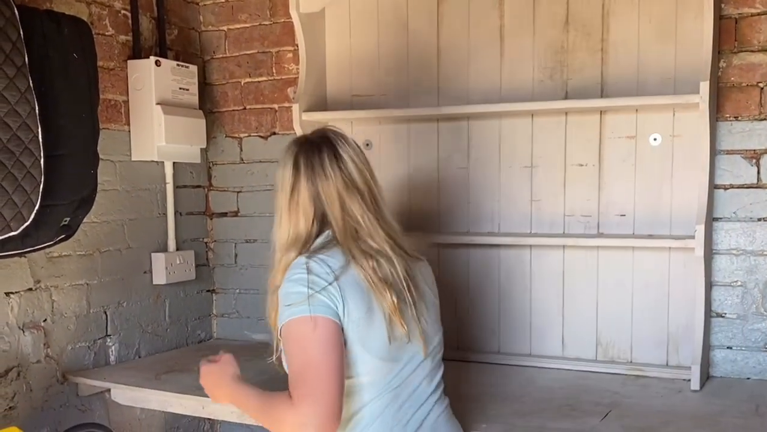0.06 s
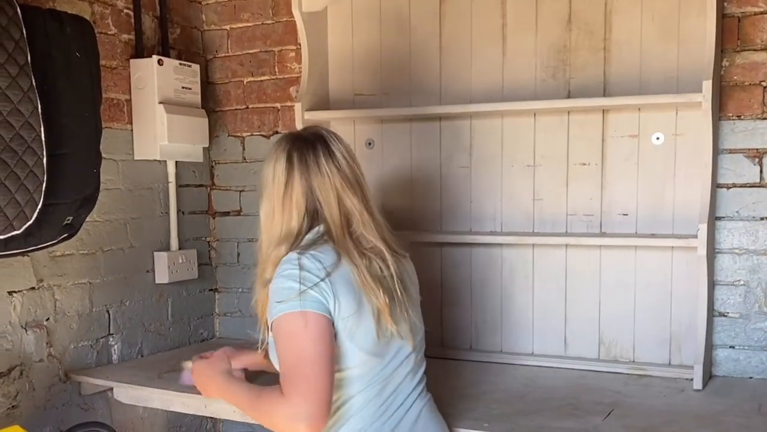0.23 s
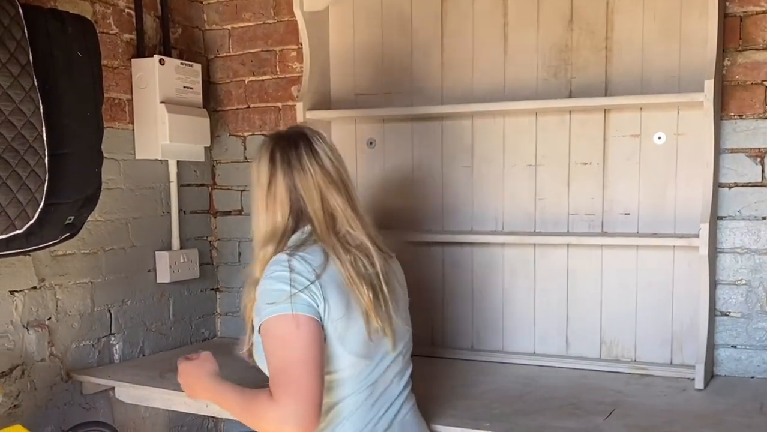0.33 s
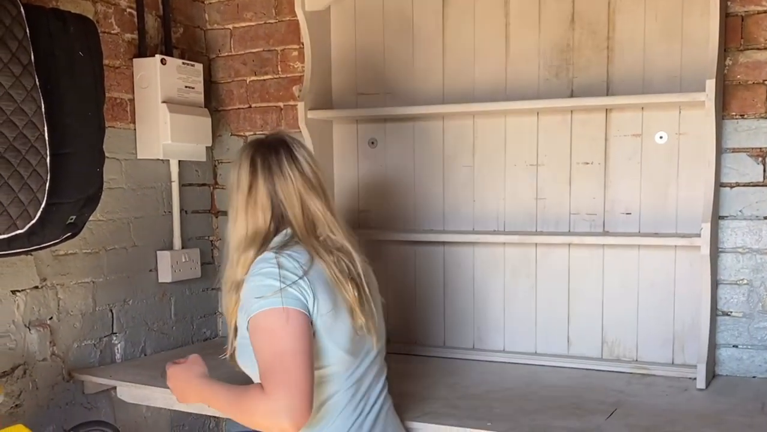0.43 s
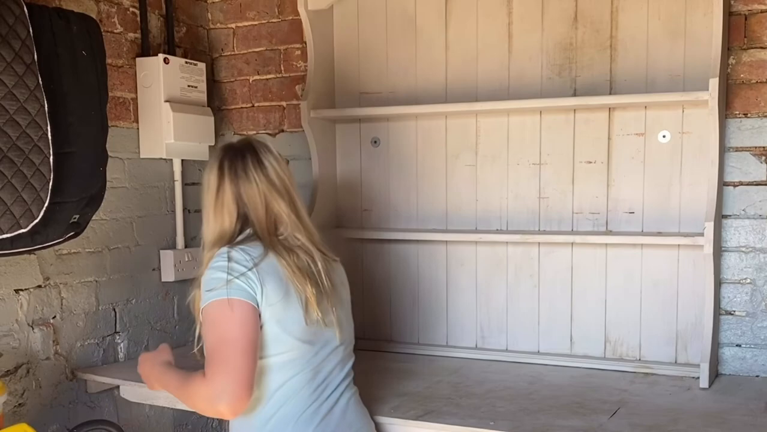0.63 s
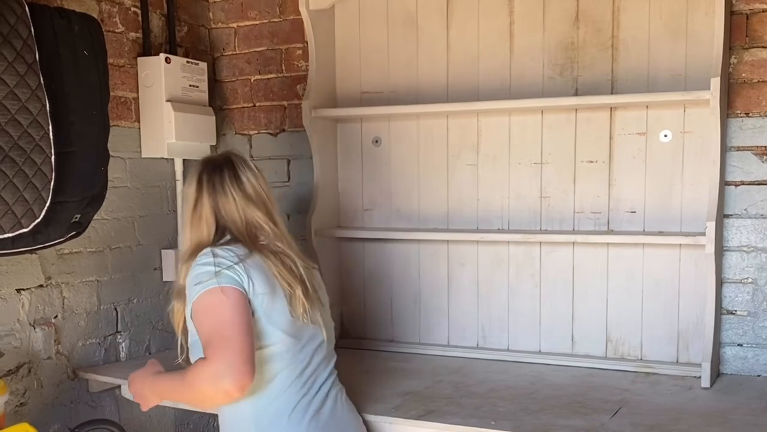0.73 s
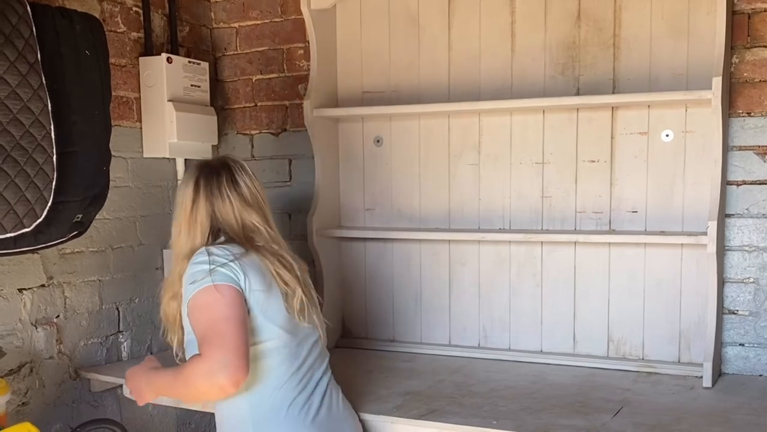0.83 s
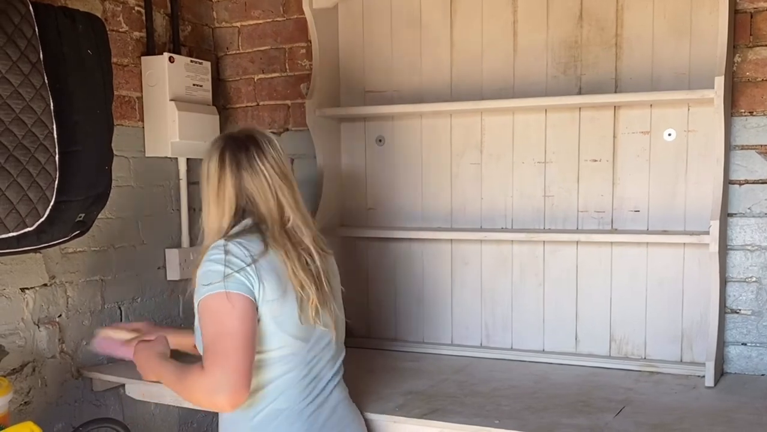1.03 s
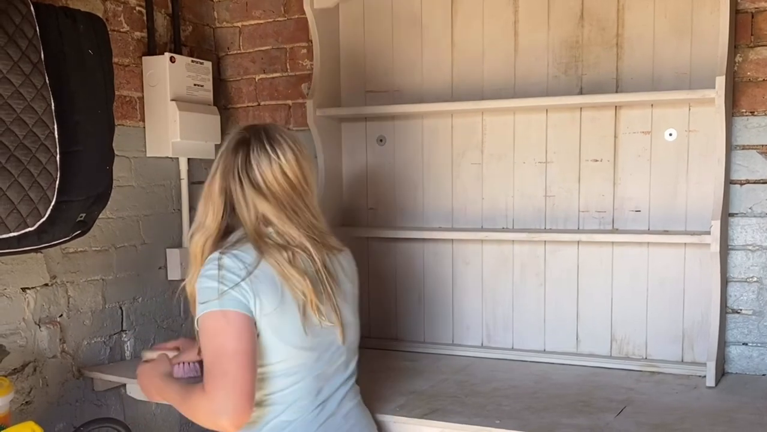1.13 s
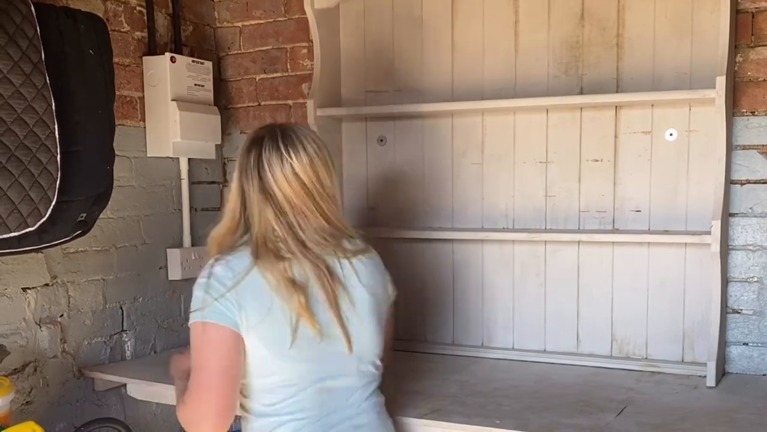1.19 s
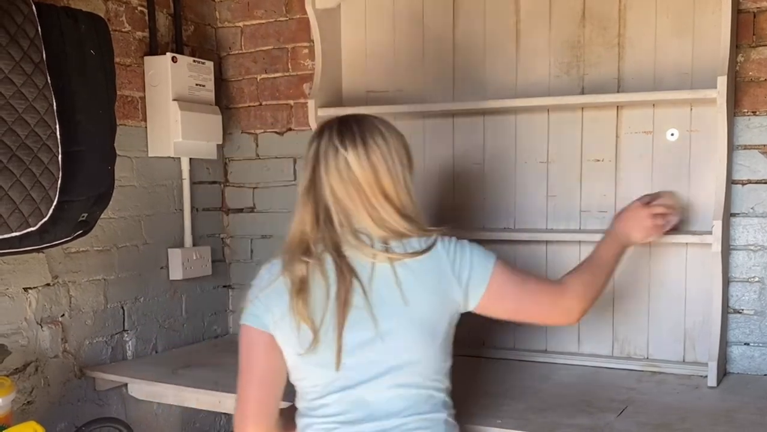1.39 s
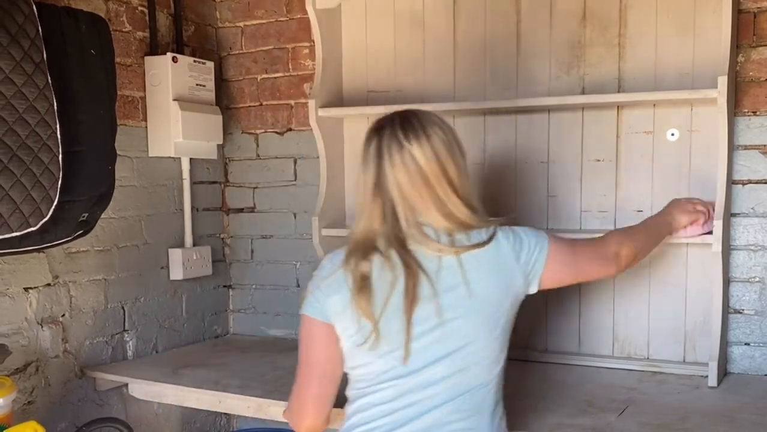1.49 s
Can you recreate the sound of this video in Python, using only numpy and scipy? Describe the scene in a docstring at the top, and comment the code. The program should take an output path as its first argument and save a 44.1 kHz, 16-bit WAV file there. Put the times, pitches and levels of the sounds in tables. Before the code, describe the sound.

A stiff hand brush scrubs a wooden shelf in short strokes, with light knocks.

```python
"""Brushing a shelf in a stable

Close up, in stereo: a stiff hand brush sweeps a wooden shelf in short strokes, in a small brick stable.
The bristles land with a tick and a thud of the board, then hiss along it and catch on the rough grain.
Once the brush's hard back knocks against the wood. Near walls answer quickly, over still air."""
import sys
import numpy as np
from scipy import signal
from scipy.fft import rfft, irfft
from scipy.io import wavfile

SR = 44100
rng = np.random.default_rng(int(sys.argv[2]) if len(sys.argv) > 2 else 0)


def pcm_store(signal):
    """Save signal as 16-bit PCM."""
    levels = np.round(np.clip(np.atleast_2d(signal), -1, 1) * 32767)
    wavfile.write(sys.argv[1], SR, levels.astype(np.int16).T)


N = 68355
T = np.arange(N) / SR
LEFT_RIGHT = np.array([[.5], [-.5]])  # splits a level difference between the channels

# One list a stroke. Each row: time in seconds, fine hiss and coarse rasp in relative dB.
STROKE_LEVELS = [
    [(0.0, -34.5, -40), (0.034, -34, -44.5), (0.084, -38.5, -50.5), (0.135, -87, -88)],
    [(0.226, -54, -64), (0.24, -39.5, -48), (0.268, -47, -46), (0.29, -53, -26.5), (0.316, -37, -46),
     (0.376, -39, -52), (0.415, -70, -70)],
    [(0.48, -43, -42), (0.486, -44, -40.5), (0.51, -42, -45.5), (0.558, -47, -47), (0.582, -36.5, -38.5),
     (0.66, -37.5, -50.5), (0.715, -79, -60)],
    [(0.788, -58, -59), (0.79, -47, -47), (0.93, -39, -49), (1.008, -42.5, -45.5), (1.046, -37, -48.5),
     (1.114, -43, -51.5), (1.155, -96, -74)],
    [(1.221, -43, -47), (1.225, -44.5, -35), (1.241, -43, -45.5), (1.271, -39, -48.5), (1.299, -46.5, -60),
     (1.311, -80, -66), (1.335, -68, -85)],
    [(1.532, -88.5, -82), (1.544, -50.5, -71.5), (1.55, -44.5, -50.5)],
]
# Each row, in these and all other colours: frequency in Hz, relative spectral density in dB.
HISS_COLOUR = [(2500, -26.5), (4500, -1), (6000, 1), (7300, -0.5), (9200, 2.5), (11500, -2), (14000, -2.5),
               (16000, -3.5)]
RASP_COLOUR = [(300, -16.5), (800, -1), (1300, -6.5), (2200, -4.5), (3300, -.5), (5000, -3), (7000, -8.5),
               (12000, -20.5)]
def sweep():
    """Stiff bristles slide along the wood: a fine hiss over a flickering rasp."""
    hiss = from_db(.5) * stroke_gains(1).sum(axis=0) * noise(HISS_COLOUR)
    rasp = from_db(2) * stroke_gains(2).sum(axis=0) * noise(RASP_COLOUR)
    return hiss + rasp * flicker(rate_hz=120, depth_db=2.57)

# The brush lands on the board or jolts it. Each row: start in seconds, push in dB, low-pass in Hz,
# high-pass in Hz, bristle tick in dB, place along the board from 0 to 1.
TOUCHDOWNS = [(.001, -33.5, 377, 167, -65, 0.14), (0.2419, -15, 652, 138, -27, .31),
              (.286, -23, 447, 98.7, -73, .18), (0.486, -5, 537, 138, -22.5, 0.35),
              (0.7917, -22, 690, 130, -41, 0.02), (.814, -22, 392, 145, -65, 0.28),
              (1.128, -32.5, 260, 140, -68, .1), (1.2255, -15.5, 894, 271, -27.5, 0.26),
              (1.247, -18, 750, 111, -58, 0), (1.288, -22.5, 150, 70, -80, 0.25),
              (1.334, -33, 180, 91.5, -80, .15), (1.374, -34, 180, 108, -80, .13)]
# Each row: frequency in Hz, level in dB, time to fall 60 dB in seconds, extra dB when rubbed.
BOARD_MODES = [(70, -29.5, .45, -9.5), (113.6, -21.5, 0.54, -6), (141.7, -6, .32, -2),
               (197.1, -5, 0.23, -3.5), (223, -5, 0.16, -1), (248, -2.5, 0.17, 4.5), (321.8, -6, 0.14, 0),
               (375.6, -1.5, 0.14, -0.5), (452.8, -3, .1, 1.5), (578, -9, 0.06, 2.5),
               (662, -9, 0.081, -4.5), (759, -11, 0.074, 2.5), (929.6, -21, 0.13, -3),
               (1236, -12, 0.082, -1.5)]
def thuds(node_share=.32):
    """Each landing rings the board; a mode struck at its node gets only a share of the push."""
    pushes = np.array([butter(butter(click(s, db), dull_hz, "low"), thin_hz, "high")
                       for s, db, dull_hz, thin_hz, _, _ in TOUCHDOWNS])
    places = np.array(TOUCHDOWNS)[:, 5]
    board = 0
    for k, (hz, db, t60, _) in enumerate(BOARD_MODES):
        shape = node_share + (1 - node_share) * np.abs(np.sin(np.pi * (k + 1) * places))
        board += (-1) ** k * from_db(db) * ring(shape @ pushes, hz, t60)
    return board

# Colour of the bristle tips landing, in Hz and dB.
TICK_COLOUR = [(200, -2), (600, 10), (1400, 5.5), (2500, -7), (5500, -4), (9000, -11), (16000, -27)]
def ticks(lead_s=.003):
    """The bristle tips tick on the wood just ahead of each thud."""
    envelope = sum(from_db(db) * burst(s - lead_s, rise_s=.002, fall_s=.009)
                   for s, _, _, _, db, _ in TOUCHDOWNS)
    return envelope * noise(TICK_COLOUR)

# Each row: centre and half length in seconds, board and scratch in dB, centre of the drive in Hz.
GRAIN_CATCHES = [(0.285, 0.016, -34, -32.5, 413), (0.574, 0.02, -30, -42.5, 393),
                 (0.679, 0.0082, -41, -47, 180), (0.882, 0.033, -42.5, -46, 1100),
                 (1.001, .02, -33.5, -47, 1080)]
# Colour of bristles on rough grain, in Hz and dB.
SCRATCH_COLOUR = [(500, -1.5), (1500, 4.5), (2300, -0.5), (3200, -10.5), (5500, -8), (9000, -2.5),
                  (16000, -15)]
def scratches():
    """The bristles scratch briefly wherever the grain catches them."""
    envelope = sum(from_db(db) * swell(s, half_s) for s, half_s, _, db, _ in GRAIN_CATCHES)
    return envelope * noise(SCRATCH_COLOUR) * flicker(rate_hz=200, depth_db=1.5)

# How hard each stroke drives the board, in dB added to its rasp column.
STROKE_PRESSURE = [-0.5, 2, 4, 7.5, -2.5, 13.5]
def drag():
    """The board drones under the dragging bristles, more where they catch."""
    drives = [(from_db(STROKE_PRESSURE) @ stroke_gains(2), slips())]
    for s, half_s, db, _, hz in GRAIN_CATCHES:
        friction = butter(butter(slips(), hz / 2, "high"), hz * 2, "low")
        drives.append((from_db(db) * swell(s, half_s), friction))
    force = sum(envelope * friction / np.std(rubbed_board(friction)) for envelope, friction in drives)
    return rubbed_board(force)

def slips(per_s=4200, spread_db=3.5):
    """Single bristles slip in dense, random flicks of force."""
    flicks = (rng.random(N) < per_s / SR) * rng.standard_normal(N)
    return flicks * from_db(spread_db * rng.exponential(1, N))

def rubbed_board(force):
    """The board's modes ring in answer to friction."""
    return sum((-1) ** k * from_db(db + extra_db) * ring(force, hz, t60)
               for k, (hz, db, t60, extra_db) in enumerate(BOARD_MODES))

# The back's quick double contact. Each row: start in seconds, level in dB.
BACK_CONTACTS = [(.2866, -10.5), (.2903, -9.5)]
# Each row: frequency in Hz, level in dB, time to fall 60 dB in seconds (capped at most_cycles),
# left minus right in dB.
KNOCK_MODES = [(406, -8, .19, -3.5), (675, -3, 0.12, 0), (821, -14.5, .13, 5.5), (1011, -5, 0.044, -5),
               (1084, 0.5, 0.05, -7), (1230, -10.5, 0.05, 2.5), (1424, -6.5, 0.054, 9), (1555, -7, .06, -1),
               (1600, -17, .075, 1), (1995, -11.5, 0.095, 5.5), (2320, -15, 0.08, 9), (2556, -6.5, 0.12, 3),
               (2900, -13, 0.042, 2), (3640, -14, 0.098, 1)]
# Colour of the hard contact, in Hz and dB.
CRACK_COLOUR = [(90, -42), (300, -6), (900, 8.5), (2700, -2), (4200, -17), (8000, -24), (16000, -27.5)]
def knock(most_cycles=120, left_lag_s=.00008):
    """The brush's back hits the wood: a crack, and a hollow ring that reaches the left side later."""
    force = butter(sum(click(s, db) for s, db in BACK_CONTACTS), 260, "high")
    left, right = sum(
        (-1) ** k * from_db(db + pan_db * LEFT_RIGHT) * ring(force, hz, min(t60, most_cycles / hz))
        for k, (hz, db, t60, pan_db) in enumerate(KNOCK_MODES))
    crack = from_db(-12) * burst(BACK_CONTACTS[0][0], rise_s=.0006, fall_s=.008) * noise(CRACK_COLOUR)
    return np.array([delayed(left, left_lag_s), right]) + crack

# Each row: centre in seconds, half length in seconds, level in dB, low-pass in Hz.
CARRY_RUSTLES = [(0.466, 0.056, -58, 12000), (0.736, 0.044, -56.5, 12030), (1.21, 0.039, -60, 11900),
                 (1.367, 0.023, -61, 8100), (1.453, 0.048, -61.5, 1710)]
# Colour of the carried brush, in Hz and dB.
RUSTLE_COLOUR = [(400, 11.5), (1400, -2), (2500, -4), (4000, -3), (7000, -6.5), (15000, -9)]
def rustles():
    """The brush rustles faintly as it is carried between strokes."""
    return sum(from_db(db) * swell(s, half_s) * butter(noise(RUSTLE_COLOUR), dull_hz, "low")
               for s, half_s, db, dull_hz in CARRY_RUSTLES)

# One row: start in seconds, level in dB, fall in seconds.
LONE_FLICK = (1.511, -55.5, .004)
# Colour of a single bristle, in Hz and dB.
BRISTLE_COLOUR = [(3000, -23), (5500, -14.5), (6400, 3.5), (7500, -5), (15000, -20)]
def bristle_flick():
    """One bristle flicks just before the last stroke."""
    s, db, fall_s = LONE_FLICK
    return from_db(db) * burst(s, .0013, fall_s) * noise(BRISTLE_COLOUR)

# What the room sends back to the microphones. Each row: frequency in Hz, gain in dB.
REFLECTIONS = [(60, -22), (250, -13), (450, -6.5), (1000, -6), (3000, -10), (14000, -8)]
def stable(x, first_echo_s=.003, early_t60=.084, tail_t60=.29, tail_db=-29.5):
    """Shelves and brick walls return dense early reflections, then a faint tail."""
    decay = (from_db(-60 * T / early_t60) + from_db(tail_db - 60 * T / tail_t60)) * (T > first_echo_s)
    power = np.mean(from_db(at_hz(REFLECTIONS, np.linspace(0, SR / 2, N))) ** 2)
    response = np.sqrt(power / np.sum(decay ** 2)) * decay * noise(REFLECTIONS)
    return signal.fftconvolve(x, response, axes=1)[:, :N]

# Colour of the room tone, in Hz and dB.
AIR_COLOUR = [(25, -22), (50, -13), (75, -7.5), (130, 2.5), (250, -4), (450, -11), (900, -26), (1500, -33),
              (3000, -37.5), (15000, -46.5)]
def still_air():
    """A faint, low room tone lies behind the brush."""
    return from_db(-55.5) * noise(AIR_COLOUR)

# Balance at the microphones. Each row: frequency in Hz, left minus right in dB.
BALANCE = [(100, 1.95), (500, -2.2), (1100, 1.7), (2200, 1.5), (4500, 0.5), (12000, 0.5)]
def scene():
    """Brush and shelf up close, the stable around them, each band leaning a little to one side."""
    wood = thuds() + drag() + knock()
    brush = sweep() + ticks() + scratches() + rustles() + bristle_flick()
    sound = wood + brush + stable(wood + from_db(.5) * brush) + still_air()
    pan_db = at_hz(BALANCE, np.arange(N + 1) * SR / (2 * N))
    return irfft(rfft(sound, 2 * N) * from_db(pan_db * LEFT_RIGHT))[:, :N]

def record(dry):
    """The recorder rounds the highest peaks and cuts the top treble steeply."""
    ceiling, cutoff_hz = .98, 15900
    rounded = dry / (1 + (dry / ceiling) ** 6) ** (1 / 6)
    return signal.sosfilt(signal.ellip(12, .1, 80, cutoff_hz, fs=SR, output="sos"), rounded)

# Each row: frequency in Hz, likeness of the left and right microphones from 0 to 1.
COHERENCE = [(40, 0.33), (130, .98), (300, .95), (550, .45), (1200, 0.26), (2500, 0.22), (4500, 0.089),
             (8000, 0.16), (12000, 0.45), (16000, .75)]
def noise(colour):
    """Coloured stereo noise at rms 1, most alike on both sides in the upper bass."""
    hz = np.arange(N // 2 + 1) * SR / N
    mid, side = rfft(rng.standard_normal((2, N)))
    alike = at_hz(COHERENCE, hz)
    pair = np.sqrt(1 + alike) * mid + np.sqrt(1 - alike) * side * [[1], [-1]]
    return rms_one(irfft(pair * from_db(at_hz(colour, hz)), N))

def stroke_gains(column):
    """A gain curve for each stroke, silent outside it; column 1 is hiss, 2 is rasp."""
    return np.array([from_db(np.interp(T, rows[:, 0], rows[:, column], left=-200, right=-200))
                     for rows in map(np.array, STROKE_LEVELS)])

def ring(force, hz, t60):
    """A force sets one decaying mode ringing."""
    radius = np.exp(-np.log(1000) / (t60 * SR))
    angle = 2 * np.pi * hz / SR
    return signal.lfilter([0, np.sin(angle)], [1, -2 * radius * np.cos(angle), radius ** 2], force + 1e-18)

def flicker(rate_hz, depth_db):
    """A gain that wanders at random."""
    return from_db(depth_db * rms_one(butter(rng.standard_normal(N), rate_hz, "low")))

def click(s, db):
    """One impulse."""
    return from_db(db) * (np.arange(N) == int(s * SR))

def burst(s, rise_s, fall_s):
    """An envelope with a straight rise and an exponential fall."""
    age = np.maximum(T - s, 0)
    return np.minimum(age / rise_s, 1) * np.exp(-np.maximum(age - rise_s, 0) / fall_s)

def swell(s, half_s):
    """A bell-shaped envelope."""
    return np.exp(-.5 * ((T - s) / half_s) ** 2)

def delayed(x, s):
    """The same sound s seconds later."""
    return irfft(rfft(x, 2 * N) * np.exp(-1j * np.pi * np.arange(N + 1) * s * SR / N))[..., :N]

def butter(x, hz, kind):
    """Second-order low- or high-pass."""
    return signal.sosfilt(signal.butter(2, hz, kind, fs=SR, output="sos"), x + 1e-18)

def at_hz(table, hz):
    """Read a table on a log-frequency axis."""
    table_hz, values = np.transpose(table)
    return np.interp(np.log(np.maximum(hz, 1)), np.log(table_hz), values)

def from_db(db):
    """Decibels to gain."""
    return 10 ** (np.asarray(db) / 20)

def rms_one(x):
    """Scale to rms 1."""
    return x / np.sqrt(np.mean(x ** 2) + 1e-20)

dry = scene()
out = record(dry)
pcm_store(out)
```